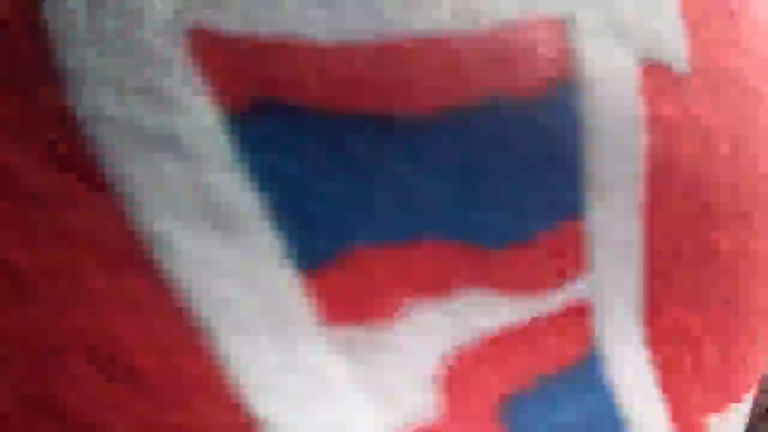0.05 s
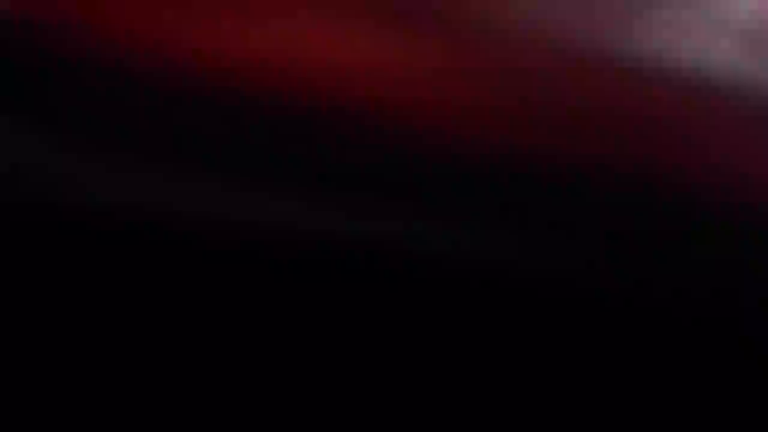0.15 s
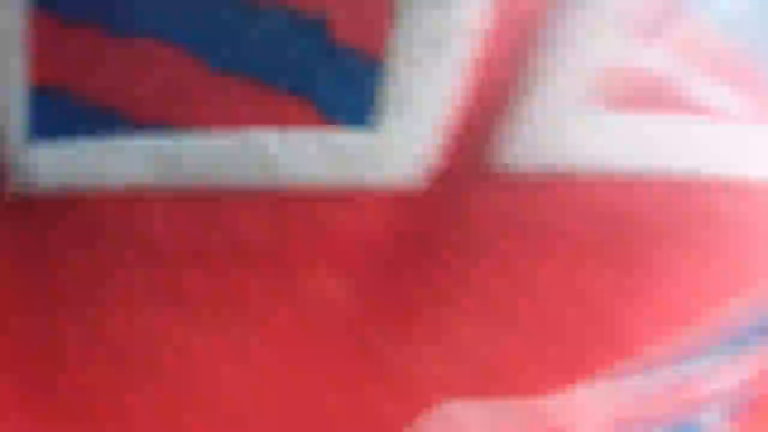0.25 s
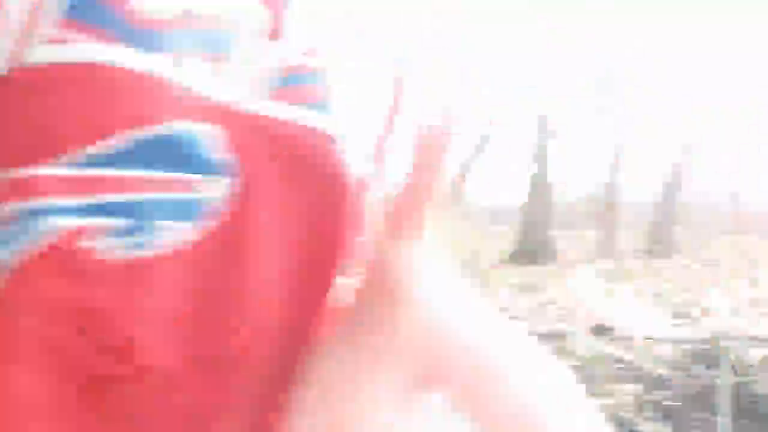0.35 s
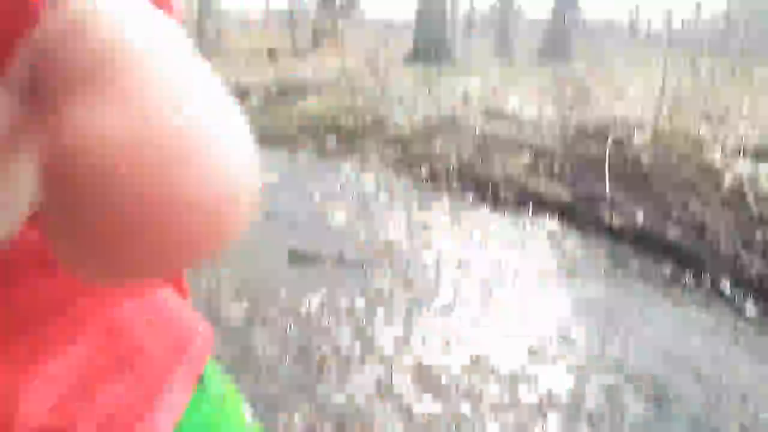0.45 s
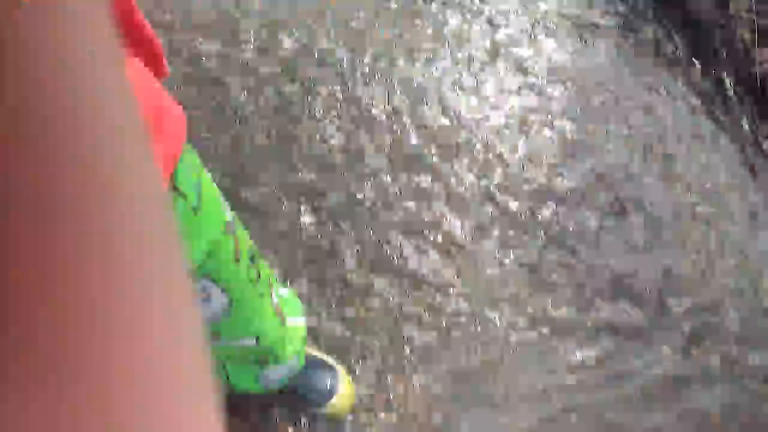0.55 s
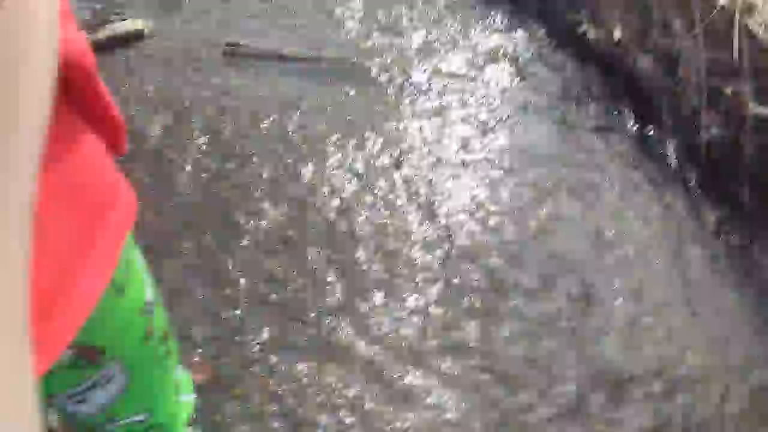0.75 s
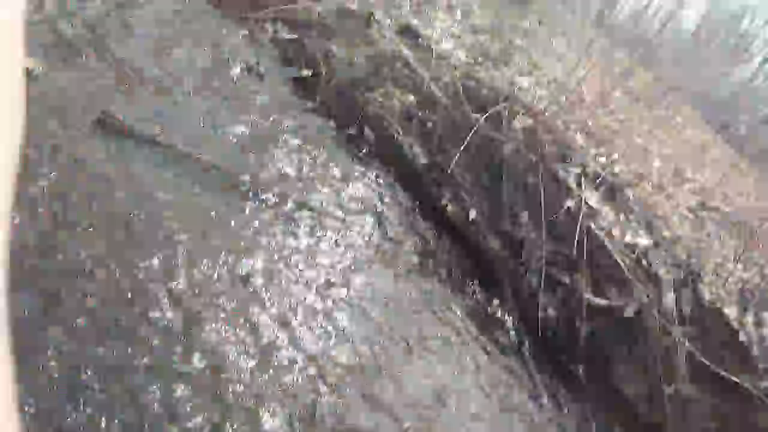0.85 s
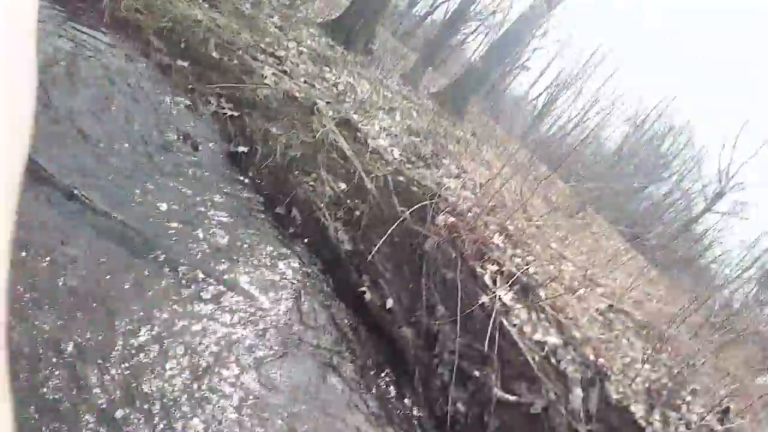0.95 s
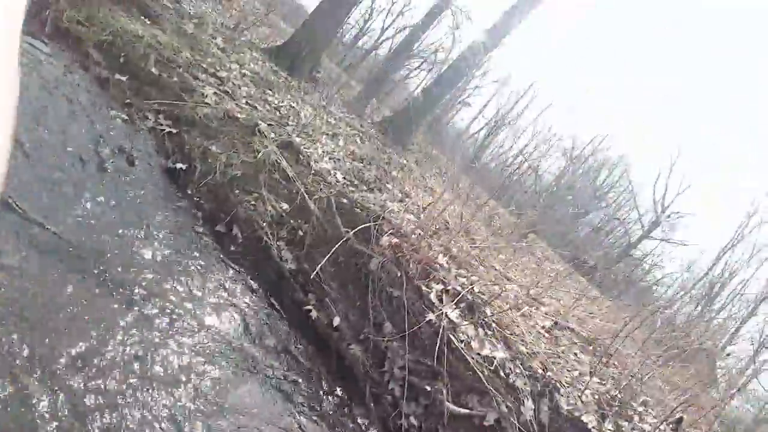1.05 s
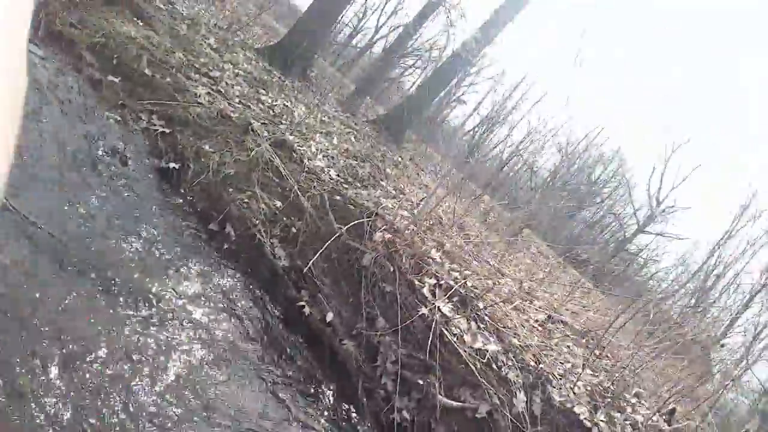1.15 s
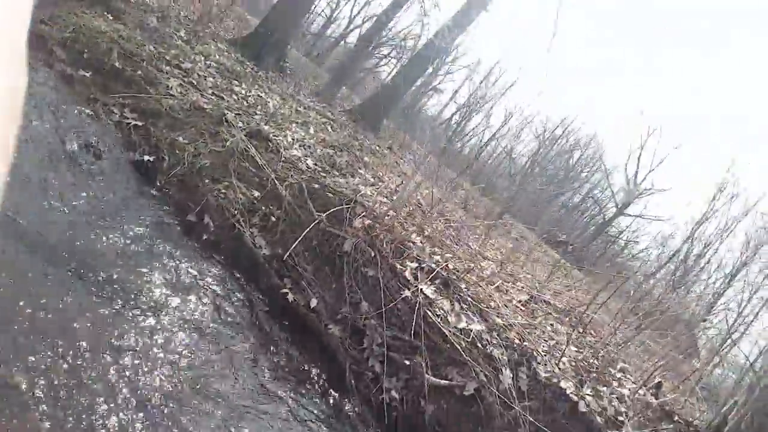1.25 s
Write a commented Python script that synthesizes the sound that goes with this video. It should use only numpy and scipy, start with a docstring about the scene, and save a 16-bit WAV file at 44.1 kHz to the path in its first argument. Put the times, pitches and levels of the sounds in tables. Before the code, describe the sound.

Water sloshes around boots wading a shallow creek, after cloth rubs and knocks the microphone

```python
"""Wading a woodland creek, camera against the shirt

Someone wades through a shallow creek, the small camera held close against their clothes.
Cloth, made of random clicks, rubs over the microphone ports; a snag makes the case ring and rasp.
Then water sloshes round the boots: gliding, dying tones make the bubbles and droplets,
bursts of noise the ticks. Decaying tones make the handling bumps; shaped noise, rumble and creek."""
import sys
import numpy as np
from scipy import signal
from scipy.fft import rfft, irfft
from scipy.io import wavfile
from scipy.ndimage import uniform_filter1d

SR = 44100
rng = np.random.default_rng(int(sys.argv[2]) if len(sys.argv) > 2 else 0)


def put_to_file(sound):
    """Save the sound as 16-bit audio at rate SR, in the file named by the first command-line argument."""
    columns = np.atleast_2d(sound).T  # one column per channel
    safe = np.clip(columns, -1, 1)
    whole_steps = np.round(safe * 32767)
    wavfile.write(sys.argv[1], SR, whole_steps.astype(np.int16))


N = 57330

BUBBLE_RISE_S = 0.0017  # time constant of a bubble's swell


def rub():
    """Threads catch and slip on the case: a low rumble, nearly separate at each port."""
    # cloth on the case: time_s, left_db, right_db
    rub_levels = [(0, -71, -26.5), (.026, -46, -27.5), (.064, -76, -28), (.14, -65, -32), (.166, -49, -59),
                  (.22, -57, -67), (.238, -37, -54), (.25, -62.5, -72)]
    # its spectrum: frequency_hz, relative_db
    rub_colour = [(30, -13), (90, 0), (330, -1.5), (500, -8), (780, 1), (1100, -6.5), (1600, -13.5),
                  (3000, -16.5), (9000, -86)]
    grains = ports(lambda: clicks(2500, spread_db=1.2), shared=0.094)
    sides = np.array([curve(rub_levels, column=1), curve(rub_levels, column=2)])
    return colour(grains, rub_colour) * sides


def swish():
    """Cloth slides over the ports: a hiss of fibres, shared in the bass and separate in the treble."""
    # cloth over the ports: time_s, left_db, right_db
    swish_levels = [(0, -64, -38.5), (.064, -40, -34.5), (.15, -36.5, -38), (.18, -40, -41.5),
                    (.205, -34, -31.5), (.238, -23.5, -31.5), (.25, -23.5, -35), (.269, -37, -43),
                    (.276, -22.5, -43), (.283, -39, -54), (.288, -92, -85)]
    # its spectrum: frequency_hz, relative_db
    swish_colour = [(300, -36), (1200, -9), (2600, -4), (3600, -2), (5000, -10), (8000, -0.5), (9500, -1),
                    (13000, -3.5), (16000, -8)]
    sides = np.array([curve(swish_levels, column=1), curve(swish_levels, column=2)])
    return colour(ports(fibres, shared=1.0), swish_colour) * sides


def brushes():
    """Light brushes of cloth: uneven clicks that swell and fade along a bell curve."""
    # brushes: centre_s, bell_width_s (standard deviation), level_db, left_minus_right_db
    brush_rows = [(0.555, 0.0061, -43, -4.5), (0.617, 0.0034, -48.5, 5), (0.65, 0.0074, -48.5, 2),
                  (0.783, 0.022, -42.5, 4.5)]
    # their spectrum: frequency_hz, relative_db
    brush_colour = [(100, 14), (200, 2.5), (340, 11.5), (500, -7.5), (900, -5), (1600, -2), (3000, -8.5),
                    (7500, -5), (10000, -12.5), (16000, -15)]
    t = np.arange(N) / SR
    touch = 0
    for at, width, db, side in brush_rows:
        touch = touch + undb(db) * pan(side) * np.exp(-((t - at) / width) ** 2 / 2)
    grains = ports(lambda: clicks(8200, spread_db=2.8), shared=0.82)
    return touch * lean(colour(grains, brush_colour))


def knock():
    """The cloth snags hard on the case: clicks excite its resonances, and a wavering tone judders."""
    # resonances of the case: centre_hz, width_hz, relative_db
    case_modes = [(153, 74, 2), (356, 52, 3.5), (590, 160, -10), (725, 98, 6.5), (785, 127, 7),
                  (1009, 64, 6.5), (1292, 84, -4.5), (1640, 200, -14)]
    # force of the snag: time_s, level_db
    snag_levels = [(.234, -83), (.239, -18), (.243, -28), (.246, -9.5), (.258, -16), (.268, -15.5),
                   (.275, -19), (.279, -34.5), (.286, -88)]
    judder_hz, judder_db, judder_at_s, judder_width_s = 886.7, -11.5, 0.2596, 0.0088
    t = np.arange(N) / SR
    body = 0
    for hz, width, db in case_modes:
        body = body + undb(db) * resonate(clicks(5000, spread_db=2.9), hz, width)
    # even out the ringing by its running level, so the snag alone sets the force
    body = body / np.sqrt(uniform_filter1d(body ** 2, size=600) + 1e-12)
    waver = unit(uniform_filter1d(rng.standard_normal(N), size=60))
    judder = np.sin(2 * np.pi * np.cumsum(judder_hz * (1 + 0.068 * waver)) / SR)
    grip = undb(judder_db) * np.exp(-((t - judder_at_s) / judder_width_s) ** 2 / 2)
    return (body * curve(snag_levels) + judder * grip) * pan(7.5)


def rasp():
    """The snag drags fibres along the case, a short bright crackle."""
    # the rasp: time_s, level_db
    rasp_levels = [(.225, -35.5), (.24, -22), (.25, -14.5), (.258, -18.5), (.268, -11.5), (.275, -26.5),
                   (.284, -38), (.29, -82)]
    # its spectrum: frequency_hz, relative_db
    rasp_colour = [(1000, -17), (2600, -12.5), (3800, -0.5), (5000, 3), (7800, -1.5), (9500, -7.5),
                   (16000, -7)]
    return lean(colour(ports(fibres, shared=0.97), rasp_colour)) * curve(rasp_levels) * pan(1.4)


def bumps():
    """Dull knocks of the hand-held case, each a short decaying tone."""
    # bumps: start_s, pitch_hz, level_db, decay_s, left_minus_right_db
    bump_rows = [(0.127, 125, -44.5, 0.044, -21.5), (0.2409, 166.6, -6.5, 0.0068, 6),
                 (0.259, 74.2, -10.5, 0.017, 3.5), (.459, 80.5, -34.5, 0.028, -19.5),
                 (0.5432, 164, -25.5, 0.0091, 6.5), (.546, 353, -33.5, 0.0047, 6),
                 (0.5593, 61.5, -21.5, 0.0093, 8), (0.5592, 230, -25, 0.0039, 2.5),
                 (0.56, 403, -36, 0.0063, 4)]
    out = 0
    for at, hz, db, decay, side in bump_rows:
        out = out + undb(db) * pan(side) * ring(at, hz, decay, rise=0.0013)
    return out


def bubbles():
    """Single bubbles stirred up by the boots, each a gliding tone that swells and dies away."""
    # bubbles: start_s, pitch_hz, level_db, decay_s, glide_octaves_per_s, left_minus_right_db
    bubble_rows = [(0.3148, 884, -33.5, 0.0048, -46, -6), (0.333, 2700, -44, 0.0031, 6, 19),
                   (0.334, 6470, -39, 0.0018, -23, 5), (.348, 6760, -35, 0.002, 3, 2),
                   (0.35, 1180, -39, 0.0064, 5, 13), (.366, 3720, -25.5, 0.00092, 18, 7),
                   (0.384, 1018, -38, 0.0063, 28.5, 6), (.412, 1028, -37.5, 0.0069, -17, 7),
                   (.431, 1015, -38.5, 0.017, -19, 3), (.440, 3860, -38, 0.0017, 2, 14),
                   (0.446, 1700, -42, 0.0075, 18, 6), (.460, 990, -35, 0.0055, -31, 0),
                   (.46, 3580, -35, 0.0011, -2, 12), (.533, 940, -34.5, 0.0059, -32, 1),
                   (0.536, 2240, -40, 0.0024, -9, 17), (.547, 922, -33.5, 0.0081, 31, -4),
                   (.56, 884, -29.5, 0.0034, -12, 10), (0.565, 1270, -35.5, 0.0068, 14.5, -4),
                   (0.585, 1700, -34.5, 0.0022, 21, -10), (0.623, 910, -39, 0.0029, 14, 15),
                   (.6425, 833, -35.5, 0.0055, -11, 7), (0.659, 2680, -40.5, 0.0026, -45, 3),
                   (0.718, 5000, -32.5, 0.00095, 40, 9), (.735, 1720, -42, 0.0043, 13, 1),
                   (0.772, 291.5, -37.5, 0.015, 5.5, -3.5), (.781, 254, -37, 0.0082, 4, -1),
                   (.794, 374, -42, 0.013, -7, 0), (.803, 904, -38.5, 0.016, -0.5, -7),
                   (0.822, 1820, -42.5, 0.0067, 2, 0), (.935, 841, -40.5, 0.015, 4, 3),
                   (1.021, 2670, -30.5, 0.00083, 1, 8), (1.025, 2610, -31.5, 0.0017, 15, 8),
                   (1.057, 2940, -42, 0.0022, -28, -5), (1.13, 1720, -50.5, 0.0093, 5, 4),
                   (1.178, 1660, -40.5, 0.0062, 120, -3), (1.211, 4490, -41.5, 0.0016, -100, 9.5),
                   (1.24, 7050, -38, 0.0017, 1, 9), (1.288, 854, -37.5, 0.0041, -16, 7)]
    out = 0
    for at, hz, db, decay, glide, side in bubble_rows:
        out = out + undb(db) * pan(side) * ring(at, hz, decay, BUBBLE_RISE_S, glide)
    return out


def gurgles():
    """Water sloshes round the boots: a crowd of small bubbles with little below the low cut."""
    # slosh: time_s, level_db
    slosh_levels = [(0, -43), (.3, -55), (.34, -47.5), (.45, -48.5), (.51, -54), (.56, -44.5),
                    (.605, -54.5), (.65, -52), (.71, -61.5), (.8, -49.5), (.88, -68), (.94, -63),
                    (1.1, -64.5), (1.3, -62.5)]
    low_cut_hz = 583
    crowd = bubble_crowd(450, (745, 2200), 0.0027, glide=14.3, spread_db=8.5)
    low_cut = signal.butter(4, low_cut_hz, "high", fs=SR, output="sos")
    return signal.sosfilt(low_cut, crowd) * curve(slosh_levels)


def droplets():
    """Droplets fall back from the boots: a dense crowd of short, high bubble tones."""
    # drizzle: time_s, level_db
    drizzle_levels = [(0, -50), (.31, -59.5), (.34, -61), (.38, -65), (.41, -60.5), (.46, -62), (.55, -61),
                      (.6, -60), (.65, -67.5), (.71, -63.5), (.87, -69), (.93, -65), (1.05, -67),
                      (1.1, -70), (1.2, -61.5), (1.3, -90)]
    return bubble_crowd(1700, (2220, 8880), 0.0024, glide=24, spread_db=20.0) * curve(drizzle_levels)


def spray():
    """Fine spray and fizz on the surface: very short bubble tones, mostly separate at each port."""
    # fizz: time_s, level_db
    fizz_levels = [(0, -72), (.315, -70), (.338, -53), (.37, -53.5), (.41, -61), (.47, -55), (.51, -54.5),
                   (.55, -56), (.6, -59), (.68, -59), (.72, -64), (.82, -60.5), (.98, -59.5), (1.1, -65.5),
                   (1.3, -57.5)]
    # its spectrum: frequency_hz, relative_db
    spray_colour = [(2200, 7.5), (5000, -10.5), (7500, -5.5), (9200, -8.5), (11000, -4), (16000, 0)]

    def specks():
        """One channel of tiny specks."""
        return bubble_crowd(990, (4700, 15600), 0.00018, glide=20, spread_db=14)[0]

    return colour(ports(specks, shared=0.23), spray_colour) * pan(0.56) * curve(fizz_levels)


def ticks():
    """Sharp ticks of drops landing: decaying noise bursts, each passed twice through its own band."""
    # ticks: start_s, peak_db (before panning), centre_hz, left_minus_right_db
    tick_rows = [(.3355, -44, 13500, 3), (.3575, -44, 12800, 8), (.367, -40, 11800, 4),
                 (.3845, -41, 7600, 0), (.4705, -42, 12600, -1), (.5012, -41, 7530, 6),
                 (.5282, -39, 12000, -5), (.5355, -43, 5000, 13), (.5555, -33.5, 10700, 21),
                 (.5555, -33.5, 6460, 14), (.5573, -35.5, 6600, 15), (.561, -24, 1070, 5.5),
                 (.5613, -35, 5500, 17), (.6405, -40, 1410, -20), (.783, -36, 1500, -8),
                 (0.991, -35.5, 5930, 10), (1.051, -44, 5150, 3)]
    burst_decay_s = 0.00034
    out = 0
    for at, db, hz, side in tick_rows:
        age = np.arange(N) / SR - at
        burst = ports(white_noise, shared=0.9) * (age >= 0) * np.exp(-np.abs(age) / burst_decay_s)
        width = min(0.71 * hz, SR / 8)
        tick = resonate(resonate(burst, hz, width), hz, width)
        out = out + undb(db) * pan(side) * tick / np.abs(tick).max()
    return out


def trickles():
    """Water runs off a lifted boot in short, dense showers of like-sized droplets."""
    # showers: centre_s, bell_width_s (standard deviation of the power), level_db, middle_hz
    trickle_rows = [(.922, 0.014, -60, 3600), (0.973, 0.015, -60, 5800), (1.043, 0.013, -59, 4500),
                    (1.044, .014, -55.5, 2620)]
    spread = 1.295  # pitches reach this factor below and above the middle
    t = np.arange(N) / SR
    out = 0
    for at, width, db, hz in trickle_rows:
        pitches, span = (hz / spread, hz * spread), (at - 2 * width, at + 2 * width)
        shower = bubble_crowd(900, pitches, 0.00045, glide=28, spread_db=14, span=span)
        out = out + undb(db) * shower * np.exp(-((t - at) / width) ** 2 / 4)
    return out * pan(3)


def creek():
    """The running creek behind: steady shaped noise, mostly separate at each port."""
    # its spectrum: frequency_hz, relative_db
    creek_colour = [(250, -25), (500, -21), (680, 0), (850, -3), (1200, -7.5), (2500, -16.5), (4500, -22.5),
                    (7500, -18), (9200, -21.5), (11000, -17), (16000, -28)]
    return undb(-56.5) * colour(ports(white_noise, shared=0.29), creek_colour) * pan(0.51)


def rumble():
    """Steady low rumble of the held camera, noise nearly alike at both ports."""
    # its spectrum: frequency_hz, relative_db
    rumble_colour = [(20, -37), (45, -1), (68, 6.5), (110, -7.5), (175, -4), (260, -17.5), (370, -19),
                     (460, -32), (1000, -63)]
    return undb(-48.5) * colour(ports(white_noise, shared=0.97), rumble_colour)


def bubble_crowd(rate, hz_range, decay, glide, spread_db, span=(0, N / SR)):
    """Many bubbles at random moments of a span; the higher are rarer and die sooner.

    rate is per second, decay in s for the lowest pitch; glides run from -1 to 2 times glide (octaves/s)."""
    out = np.zeros((2, N))
    low, high = hz_range
    length = span[1] - span[0]
    for when, pitch, size, bend, side in rng.random((int(rate * length), 5)):
        hz = low * (high / low) ** (pitch ** 1.5)
        at = span[0] + when * length
        rise = min(BUBBLE_RISE_S, decay / 2)
        tone = ring(at, hz, decay * np.sqrt(low / hz), rise, glide * (3 * bend - 1))
        heard = slice(int(at * SR), int((at + 10 * decay) * SR))
        out[:, heard] += undb(spread_db * size ** 2) * pan(12 * (side - .42)) * tone[heard]
    # a short span keeps an rms near one inside itself
    return unit(out) * np.sqrt(length * SR / N)


def ring(start, hz, decay, rise, glide=0):
    """A tone that swells and dies away; it bursts once its glide has gone far enough."""
    burst_octaves = 0.96
    out = np.zeros(N)
    first = int(np.clip(start * SR, 0, N - 1))
    age = np.arange(min(int(8 * decay * SR), N - first)) / SR
    phase = 2 * np.pi * np.cumsum(np.minimum(hz * 2 ** (glide * age), SR / 2)) / SR
    alive = np.exp(-(glide * age / burst_octaves) ** 8)
    swell = 1 - np.exp(-age / rise)
    out[first:first + len(age)] = np.sin(phase) * np.exp(-age / decay) * swell * alive
    return out


def fibres():
    """The fine, even crackle of fibres sliding over plastic."""
    return clicks(20000, spread_db=1)


def clicks(rate, spread_db):
    """Random one-sample impulses of uneven size, rate per second on average."""
    struck = rng.random(N) < rate / SR
    return unit(struck * rng.standard_normal(N) * undb(spread_db * rng.standard_normal(N)))


def white_noise():
    """Noise with equal power at every frequency."""
    return rng.standard_normal(N)


def resonate(x, hz, width_hz):
    """One resonance, gain one at its centre."""
    return signal.lfilter(*signal.iirpeak(hz, hz / width_hz, fs=SR), x)


def colour(x, points):
    """Filter by a spectrum drawn on a log-frequency axis, then scale to an rms of one."""
    hz, db = np.array(points).T
    f = np.arange(N + 1) * SR / (2 * N)
    gain = undb(np.interp(np.log(f + 1), np.log(hz), db))
    return unit(irfft(rfft(x, 2 * N) * gain)[..., :N])


def ports(source, shared):
    """Two microphone ports that share part of their power, less so in the treble."""
    apart_hz = 5500  # the shared part has halved here
    f = np.arange(N // 2 + 1) * SR / N
    common = np.clip(shared, 0, 1) / (1 + (f / apart_hz) ** 2)
    both = np.sqrt(common) * rfft(source())
    own = np.sqrt(1 - common) * rfft(np.array([source(), source()]))
    return irfft(both + own, N)


def lean(x):
    """Tip each band of a contact sound towards the left or right port."""
    # tilt: frequency_hz, left_minus_right_db
    tilt = [(300, -4.5), (900, 0), (2500, 1), (4800, -2), (7300, 8.5), (10000, 3.5), (15000, -2)]
    hz, db = np.array(tilt).T
    side = np.interp(np.log(np.arange(N // 2 + 1) * SR / N + 1), np.log(hz), db)
    return irfft(rfft(x) * undb(np.array([side, -side]) / 2), N)


def pan(db):
    """Left and right gains for a left-minus-right level difference."""
    return undb(np.array([[db], [-db]]) / 2)


def curve(rows, column=1):
    """Gain over time from a table of moments and decibels."""
    rows = np.array(rows)
    return undb(np.interp(np.arange(N) / SR, rows[:, 0], rows[:, column]))


def unit(x):
    """Scale to an rms of one."""
    return x / np.sqrt(np.mean(x ** 2))


def undb(db):
    """Decibels to gain."""
    return 10 ** (np.asarray(db) / 20)


def scene():
    """Everything at the two microphone ports."""
    contact = rub() + swish() + brushes() + knock() + rasp() + bumps()
    water = bubbles() + gurgles() + droplets() + spray() + ticks() + trickles()
    return contact + water + creek() + rumble()


def record(dry):
    """The camera drops the deepest bass, rounds off loud peaks and cuts the top."""
    ceiling, low_cut_hz, top_hz = 0.85, 42.5, 15900
    low_cut = signal.butter(2, low_cut_hz, "high", fs=SR, output="sos")
    top_cut = signal.ellip(10, .2, 80, top_hz, fs=SR, output="sos")
    thinned = signal.sosfilt(low_cut, dry)
    rounded = ceiling * np.tanh(thinned / ceiling)
    return signal.sosfilt(top_cut, rounded)


dry = scene()
out = record(dry)
put_to_file(out)
```